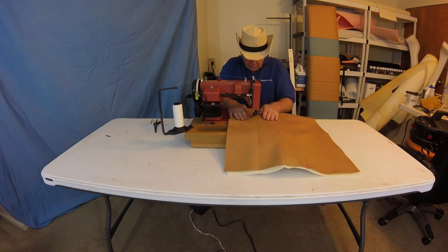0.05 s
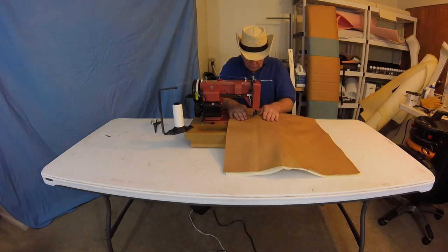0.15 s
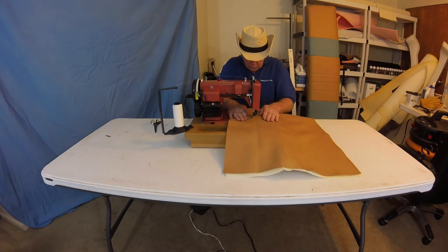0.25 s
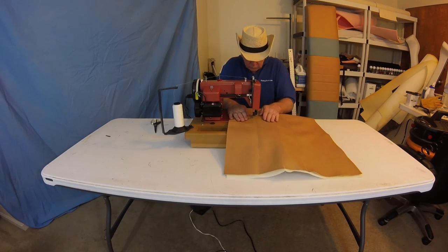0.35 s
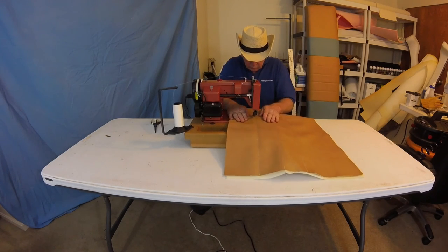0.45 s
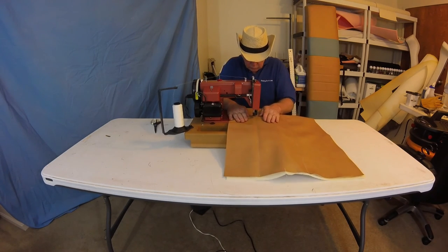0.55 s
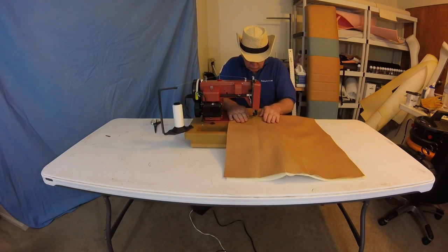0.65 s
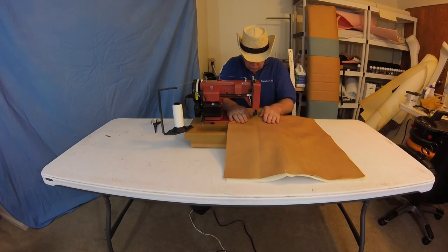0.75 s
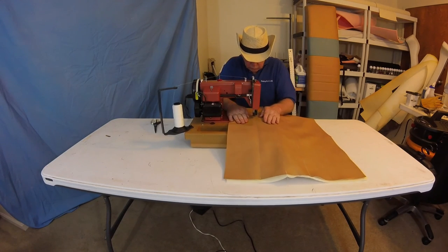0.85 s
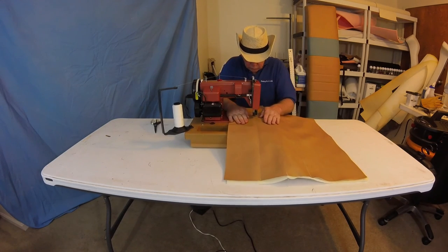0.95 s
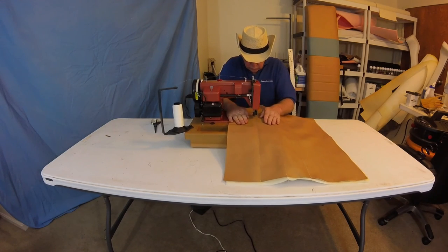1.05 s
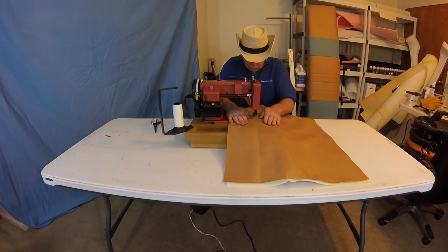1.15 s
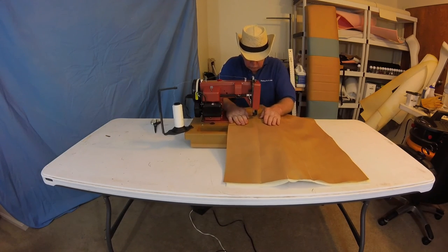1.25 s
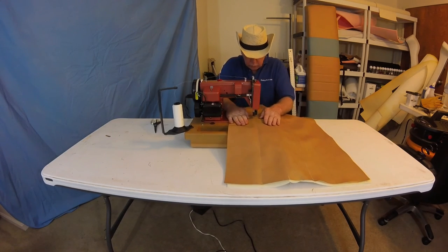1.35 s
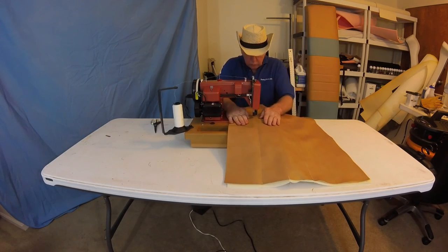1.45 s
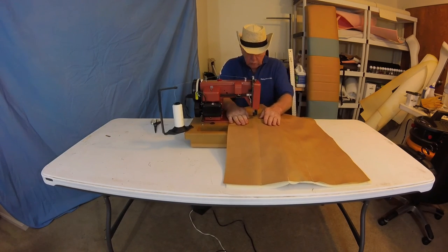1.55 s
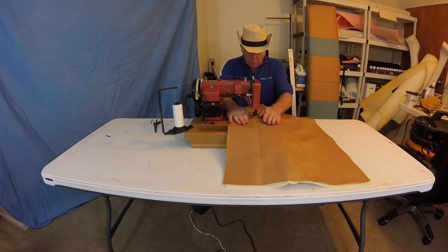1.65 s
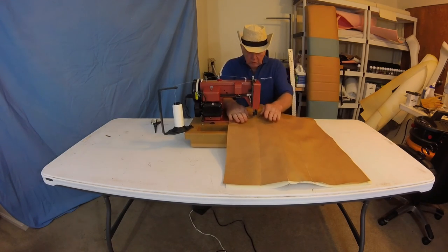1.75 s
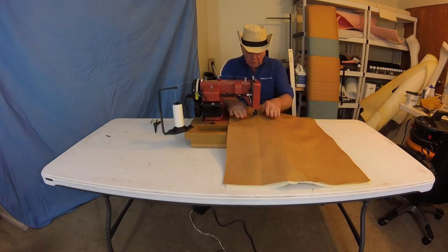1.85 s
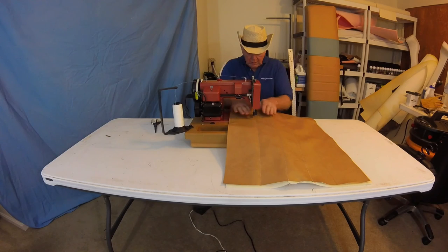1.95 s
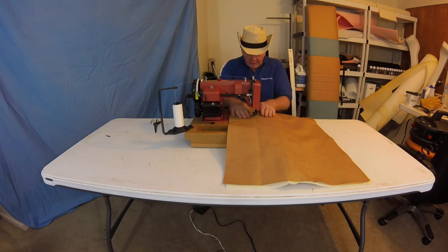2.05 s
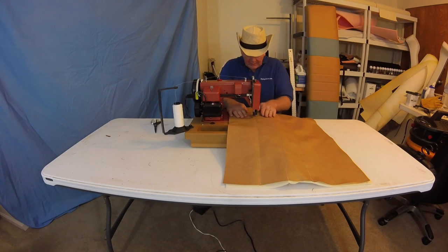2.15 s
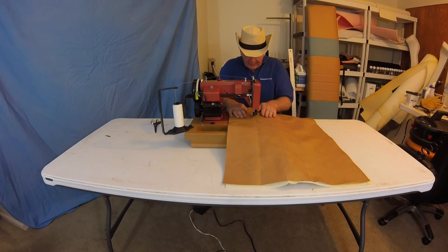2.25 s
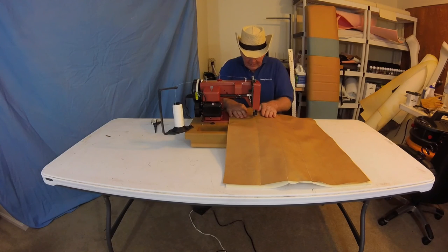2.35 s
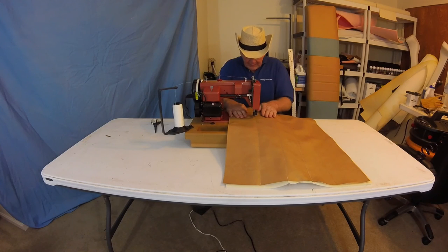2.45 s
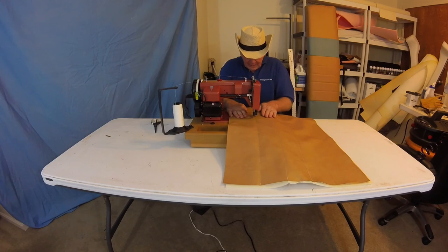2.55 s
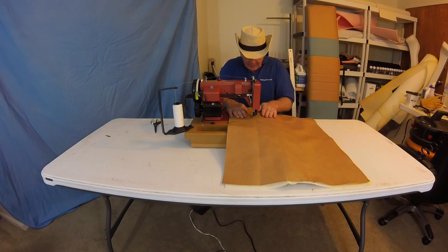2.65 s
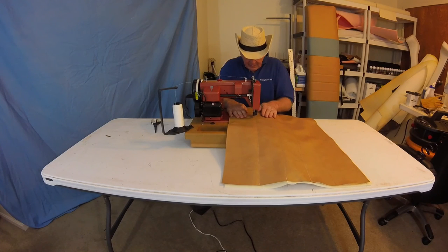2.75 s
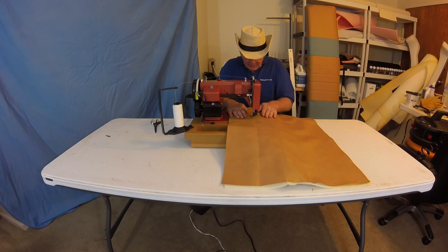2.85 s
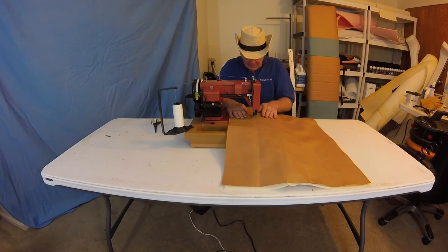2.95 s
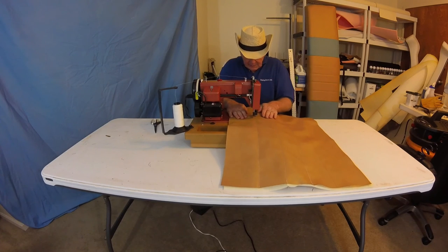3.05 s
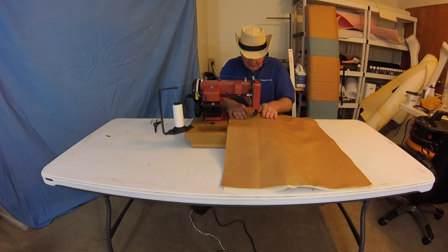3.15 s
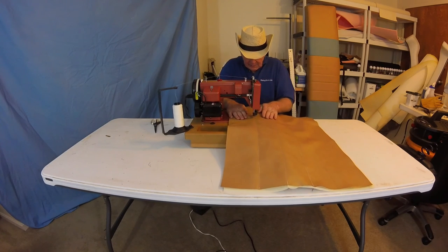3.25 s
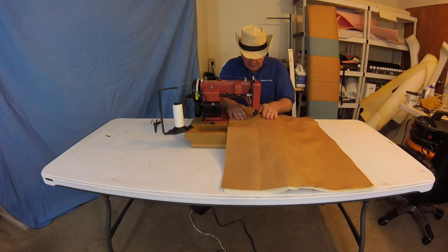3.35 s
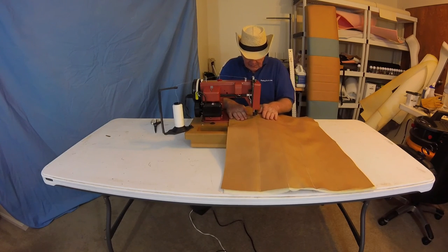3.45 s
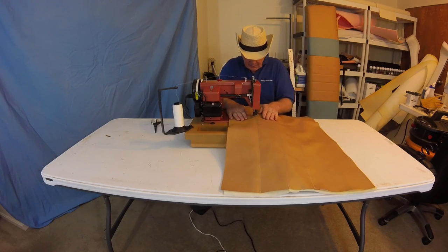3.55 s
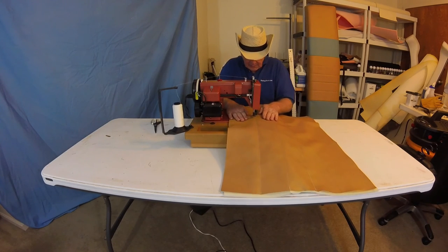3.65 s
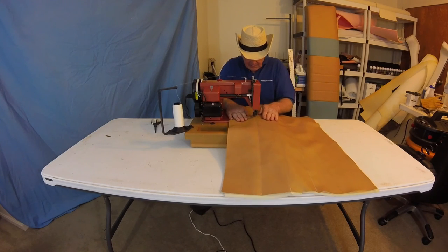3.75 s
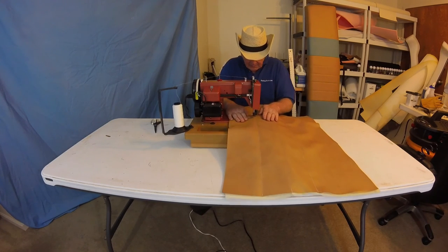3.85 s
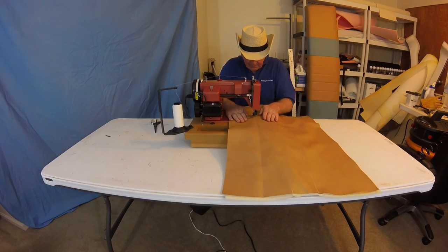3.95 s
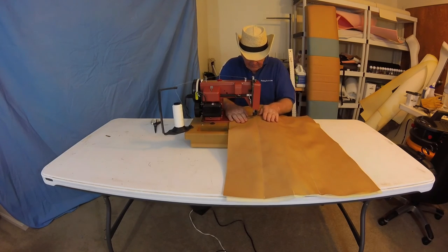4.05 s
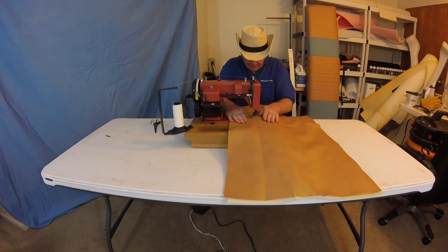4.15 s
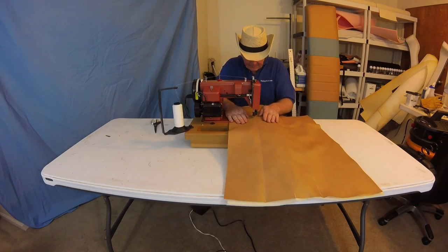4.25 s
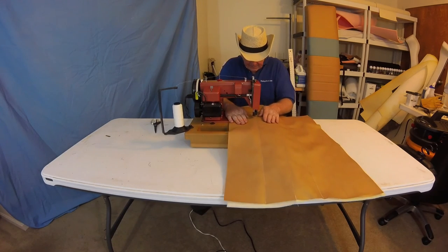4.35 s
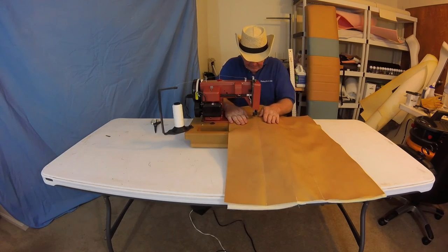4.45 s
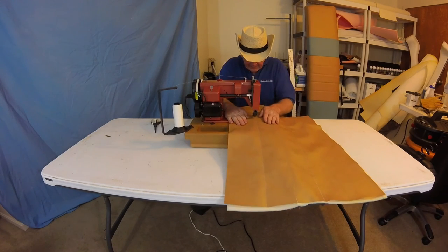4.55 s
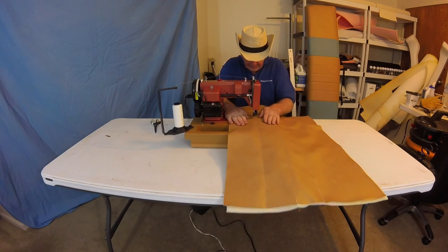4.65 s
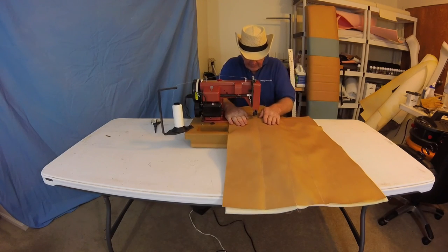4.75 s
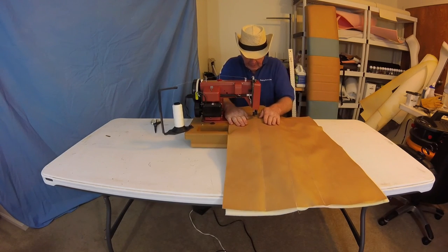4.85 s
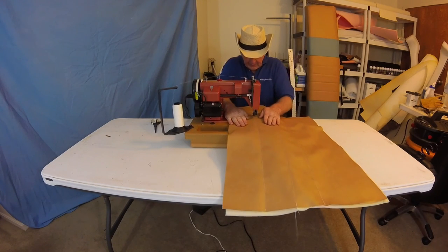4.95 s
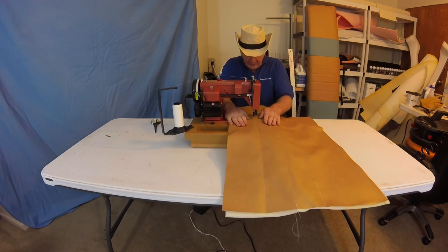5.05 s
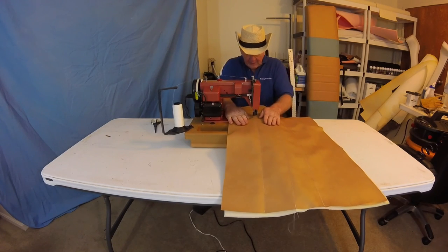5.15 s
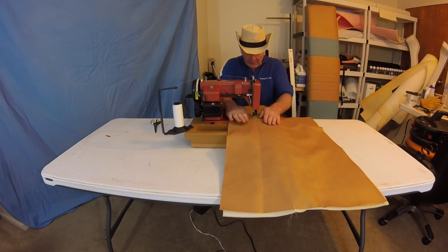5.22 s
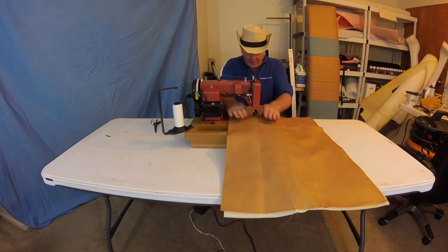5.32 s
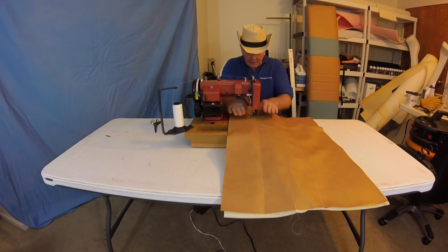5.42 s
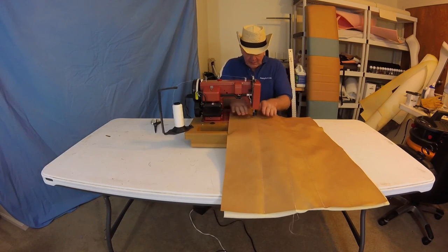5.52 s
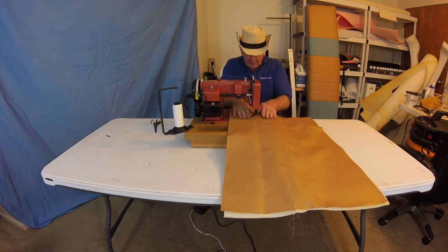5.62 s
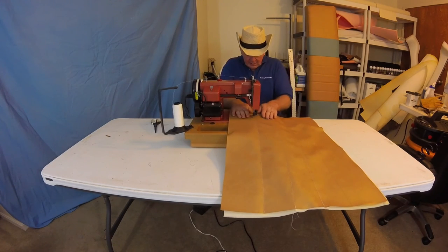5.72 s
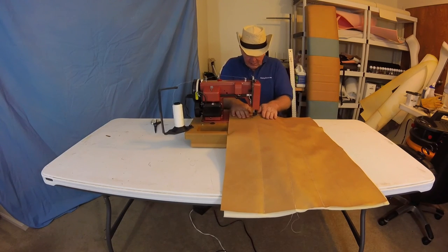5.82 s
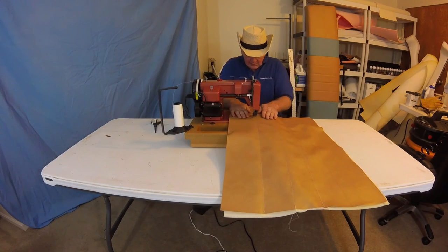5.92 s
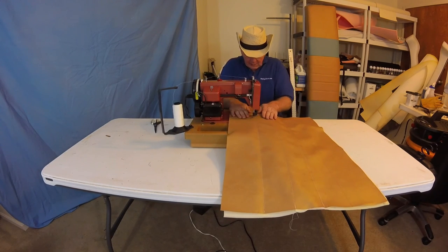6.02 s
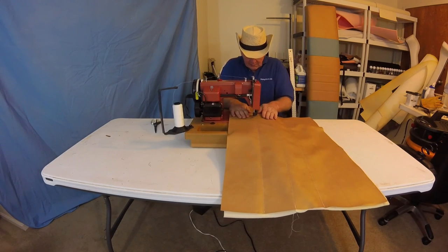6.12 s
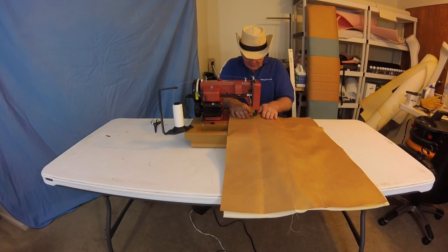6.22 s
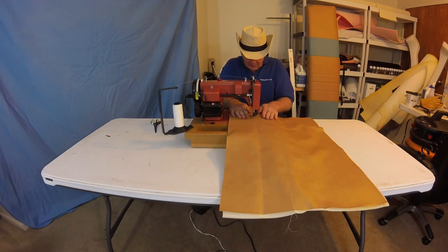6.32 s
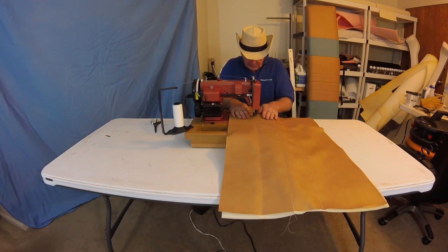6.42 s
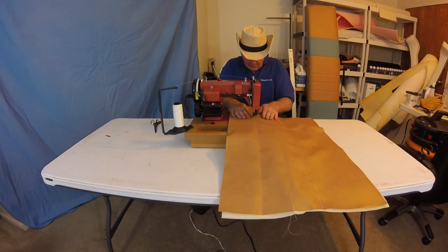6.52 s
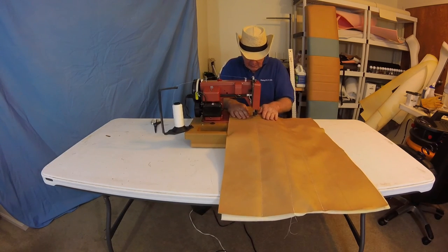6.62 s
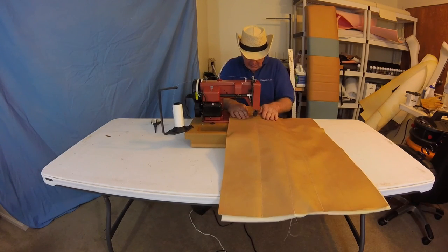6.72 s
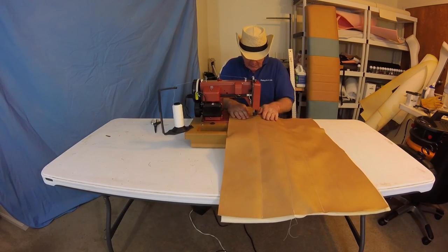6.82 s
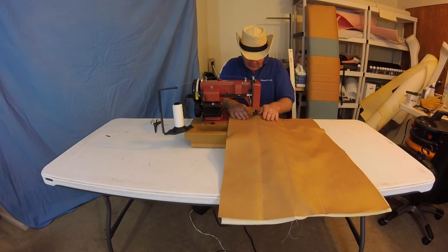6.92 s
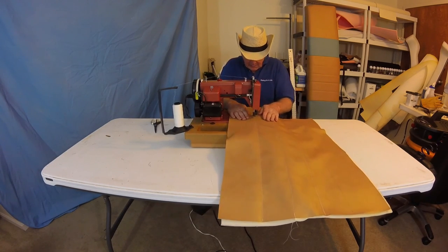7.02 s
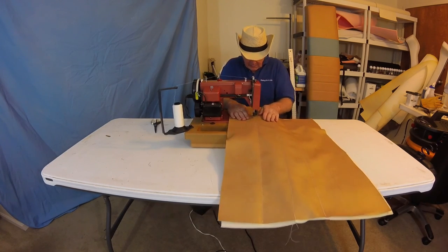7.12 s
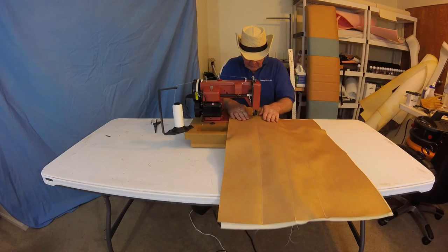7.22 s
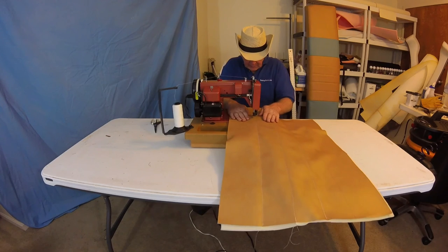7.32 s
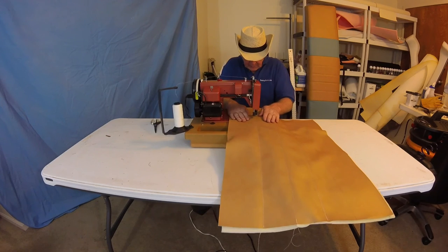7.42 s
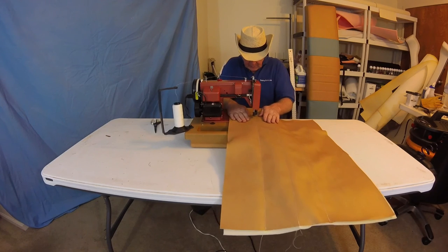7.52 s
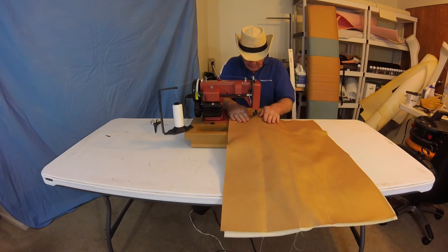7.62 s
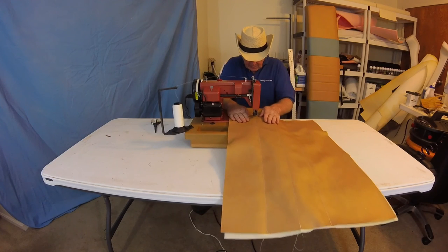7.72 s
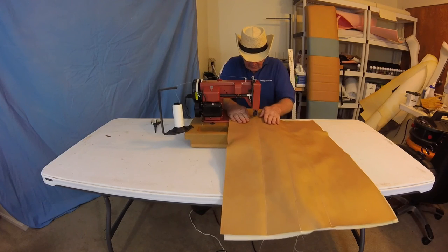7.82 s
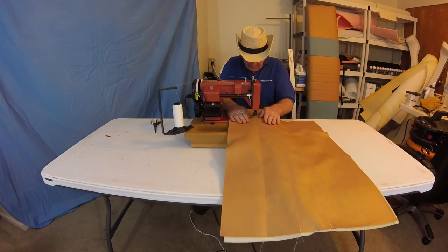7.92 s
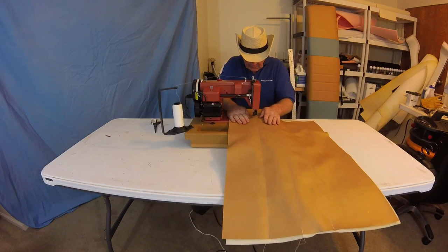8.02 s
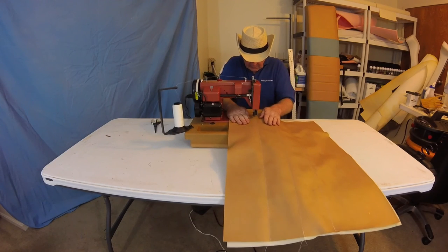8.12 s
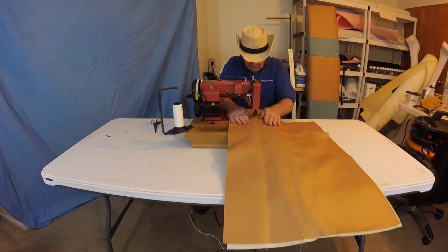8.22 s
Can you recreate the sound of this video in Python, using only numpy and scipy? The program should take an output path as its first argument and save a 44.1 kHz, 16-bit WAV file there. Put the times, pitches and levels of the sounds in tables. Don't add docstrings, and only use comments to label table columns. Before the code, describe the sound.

A heavy sewing machine on a hollow folding table, heard from a few metres away in a small cluttered workshop, nearly mono with a short tail. From 0 to about 1.1 s it runs at full speed: gritty motor whirr, rattling belts and gears, quick uneven stitch thumps. It slows with clacks and judder, stopping near 1.9 s. Hands scuff the vinyl and tap, the sharpest tap at 2.15 s, over low rumble and soft hiss. Around 2.7 s a mains buzz leads into a gentle restart, juddering near 2.9 s and reaching full speed by 3.8 s. It holds until 4.7 s, then coasts clacking to rest at 5.5 s. Scuffs and dull taps follow until about 6.1 s. At 6.4 s a harder jolt, buzz and brief thin squeak start the third run; belt teeth catch, pitch climbs, and steady sewing from 7.2 s continues to the end.

```python
import sys
import numpy as np
from scipy import signal
from scipy.io import wavfile
from scipy.ndimage import uniform_filter1d

SR = 44100
rng = np.random.default_rng(int(sys.argv[2]) if len(sys.argv) > 2 else 0)


def how_loud(loudness_db):
    steps = np.asarray(loudness_db, float) / 20
    return 10 ** steps


def file_out(sig):
    cols = np.atleast_2d(sig).T
    lim = np.clip(cols, -1, 1)
    pcm = np.round(lim * 32767).astype(np.int16)
    wavfile.write(sys.argv[1], SR, pcm)


N = 365129
T = np.arange(N) / SR

# time in seconds, speed in turns per second.
SHAFT = [
    [(0, 181), (.55, 182.2), (1.02, 179.5), (1.2, 144), (1.33, 127), (1.45, 97), (1.6, 80), (1.8, 40),
     (1.92, 5)],
    [(2.68, 5), (2.9, 103), (3.13, 137), (3.29, 146), (3.5, 175), (3.8, 182), (4.73, 181), (5.1, 97),
     (5.53, 5)],
    [(6.35, 5), (6.53, 90), (6.68, 122), (6.86, 142), (7.03, 149), (7.14, 165), (7.3, 170.5), (7.6, 172),
     (7.9, 174)],
]
FULL_TURNS_PER_S, REST_TURNS_PER_S = 180, 5


def evened(x):
    return x / np.sqrt(np.mean(x ** 2) + 1e-20)


def curve(rows, column=1):
    rows = np.vstack(rows)
    return np.interp(T, rows[:, 0], rows[:, column])


def colour(x, points, modes=()):
    hz = abs(np.fft.fftfreq(16384, 1 / SR))
    f, db = np.transpose(points)
    gain = how_loud(np.interp(np.log(hz + 1), np.log(f + 1), db, left=-70, right=-70))
    for centre_hz, width, lift_db in modes:
        gain = gain * (1 + (how_loud(lift_db) - 1) / (1 + (2 * (hz - centre_hz) / width) ** 2))
    log_gain = np.log(uniform_filter1d(gain, size=3))
    minimum_phase = -signal.hilbert(log_gain).imag
    taps = np.fft.ifft(np.exp(log_gain + 1j * minimum_phase)).real[:8192]
    return evened(signal.oaconvolve(x, taps)[:N])


def wander(hz):
    steps = rng.standard_normal(N // 64 + 1002)
    lowpass = signal.butter(2, hz * 128 / SR, output="sos")
    smooth = signal.sosfiltfilt(lowpass, steps)[500:-500]
    return np.interp(np.arange(N) / 64, np.arange(len(smooth)), evened(smooth))


def rattle(per_s, spread_db, share):
    share = np.clip(share, 0, 1)
    sizes = how_loud(spread_db * np.minimum(rng.exponential(1, N), 5)) * rng.choice([-1., 1.], N)
    impacts = evened(sizes * (rng.random(N) < per_s / SR))
    return np.sqrt(1 - share) * rng.standard_normal(N) + np.sqrt(share) * impacts


def fuzzy(hz, width):
    lowpass = signal.butter(2, width / 2, fs=SR, output="sos")
    slow = signal.sosfilt(lowpass, rng.standard_normal((2, N)).T @ [1, 1j])
    carrier = np.exp(2j * np.pi * np.cumsum(hz * np.ones(N)) / SR)
    return evened((carrier * slow).real)


def swells(rows, column):
    gain = np.zeros(N)
    for row in rows:
        u = T - row[0]
        span_s = np.maximum(np.where(u < 0, row[-2], row[-1]), .005)
        gain += how_loud(row[column] - 20 * abs(u) / span_s)
    return gain


def blows(rows, rise, fall, depth):
    db = np.zeros(N)
    for s, lift_db in rows:
        part = slice(max(round((s - .06) * SR), 0), round((s + .15) * SR))
        u = T[part] - s
        db[part] += depth * lift_db * np.exp(-.5 * (u / np.where(u < 0, rise, fall)) ** 2)
    return how_loud(db - uniform_filter1d(db, size=8000))


def labour():
    change = abs(np.gradient(uniform_filter1d(curve(SHAFT), size=4000))) * SR
    return np.clip(change / 60, 0, 1)


def powered():
    return uniform_filter1d(1. * (np.gradient(curve(SHAFT)) > 0), size=4000)


def rotor_beat():
    return 1 + 0.13 * np.cos(2 * np.pi * np.cumsum(curve(SHAFT)) / SR)


def tones(orders, levels_db, waver, jitter, band_hz):
    turns = np.cumsum(curve(SHAFT)) / SR
    out = np.zeros(N)
    for order, db in zip(orders, levels_db):
        swell = how_loud(db + waver * wander(21.0))
        out += swell * np.cos(2 * np.pi * order * turns + jitter * wander(19.3))
    sing_db = 2.4 * np.clip((curve(SHAFT) - 177) / 4, -1.5, 1)
    return out * np.sqrt(4 * band_hz / SR) * how_loud(-10 * labour() + sing_db)


def loudness(full_db, octave_db, jolt_share, pull_db):
    # time in seconds, extra jolt in dB.
    presses = [
        (2.7, 2.5),
        (6.37, 10),
    ]
    jolt_fall_s, wake_turns_per_s = 0.075, 35
    speed = curve(SHAFT)
    jolt_db = sum(db * np.exp(-np.maximum(T - s, 0) / jolt_fall_s) * (T > s) for s, db in presses)
    pulling = powered() * np.exp(-((speed - 145.6) / 24) ** 2)
    awake = np.clip((speed - REST_TURNS_PER_S) / wake_turns_per_s, 0, 1) ** 1.2
    speed_db = octave_db * np.log2(speed / FULL_TURNS_PER_S)
    return awake * how_loud(full_db + speed_db + jolt_share * jolt_db + pull_db * pulling)


def stitches(lag, mean_db, column):
    # time in seconds, extra clack in dB, extra thump in dB.
    snags = [(.005, 1.5, 1), (.406, 1, 1), (.69, 2, 3), (1.269, 6, -15), (1.395, 10, 7), (1.516, 2, 0),
             (1.628, 10, 2), (1.756, 12, 2), (2.776, -8, -1), (2.914, 0, 4), (3.257, 6, -8), (3.513, 1, 0),
             (4.197, 4.5, 0), (4.338, 3.5, -2), (4.544, 6, 7), (4.671, 6.5, 2), (4.767, 7, 4),
             (5.089, 6.5, -5), (5.191, 4, -2), (5.423, 7, 3), (6.424, 10, -2), (6.569, 5, 0),
             (6.685, 8.5, 7), (7.718, 6.5, 2), (7.95, 9, 2)]
    needle_down_s, turns_per_stitch = (.571, 4.014, 7.754), 20.7
    turns = np.cumsum(curve(SHAFT)) / SR
    run = np.searchsorted([table[0][0] for table in SHAFT[1:]], T)
    stitch = (turns - np.interp(needle_down_s, T, turns)[run]) / turns_per_stitch - lag
    at = T[1:][(np.diff(np.floor(stitch)) == 1) & (np.diff(run) == 0)]
    sizes = mean_db + 1.5 * rng.standard_normal(80)
    return [*zip(at, sizes), *((row[0], row[column]) for row in snags)]


def table_top():
    # frequency in Hz, level in dB.
    top_colour = [(38, -45), (65, -12.5), (86, -9.5), (129, -2.5), (172, -11), (242, -0.5), (314, -4.5),
                  (361, 3), (437, -3), (520, -2), (680, -29), (1140, -120)]
    drone = tones((.5, 1.39, 2), (-6.5, -9, -18), waver=0.73, jitter=0.89, band_hz=286)
    thumps = blows(stitches(lag=0, mean_db=2.5, column=2), rise=.018, fall=.018, depth=.8)
    gain = loudness(full_db=-35.5, octave_db=5.5, jolt_share=1.85, pull_db=1.8)
    return colour(rattle(400, 4.3, 0.17) + drone, top_colour) * gain * thumps


def cast_body(clacks):
    # frequency in Hz, level in dB.
    cast_colour = [(400, -12), (520, -6), (800, 0.5), (1200, -9), (1400, -14.5), (1650, -24.5), (2000, -85)]
    # frequency in Hz, width in Hz, lift in dB.
    cast_modes = [(651, 5, 9.5), (714, 100, 2), (809, 87, -4.5), (964, 8, 10.5), (1052, 26, 3),
                  (1176, 33, 6), (1360, 25, 5.5)]
    bright_turns_per_s, dull_hz = 80, 780
    speed = curve(SHAFT)
    pulley = how_loud(-19 + 1.46 * labour()) * fuzzy(speed * 10, 71)
    gear_tones = tones((3, 3.9, 4, 6), (-13, -21.5, -15, -19), waver=2.6, jitter=.7, band_hz=2500)
    body = colour(rotor_beat() * rattle(1500, 2.6, .5) + pulley + gear_tones, cast_colour, cast_modes)
    body *= loudness(full_db=-30.5, octave_db=7, jolt_share=2.04, pull_db=.6) * clacks
    dull = signal.sosfilt(signal.butter(2, dull_hz, fs=SR, output="sos"), body)
    return dull + (body - dull) * np.clip(speed / bright_turns_per_s, 0, 1)


def motor_whirr(clacks):
    # frequency in Hz, level in dB.
    motor_colour = [(1300, -8.5), (1700, -6), (2200, 1), (3000, -5.5), (4400, -8), (5000, -7.5),
                    (7000, -12), (8500, -8.5), (9000, -14.5), (12000, -17), (15000, -21)]
    # frequency in Hz, width in Hz, lift in dB.
    motor_modes = [(2014, 18, 7.2), (2160, 130, 0.95), (2243, 33, 7.4), (2550, 92, 4.3), (2868, 125, 5.6),
                   (3104, 160, 5.2), (3440, 154, 6.1), (4030, 83, 3.9), (6220, 160, 5.9), (7560, 150, 3.1),
                   (8030, 500, 3.2)]
    speed = curve(SHAFT)
    strain_db = 3 + (7 + 2 * powered()) * np.exp(-((speed - 136) / 24) ** 2) + 2 * wander(8)
    chatter = how_loud(-15) * fuzzy(speed * 22.6, 520)
    chatter += how_loud(-23 + strain_db) * fuzzy(speed * 24, 260)
    whine = tones((10, 11, 11.4, 12, 12.6, 13, 15.4, 23.2, 24),
                  (-19.5, -17.5, -20, -17.5, -14, -28, -22, -41, -10), waver=1.6, jitter=.38, band_hz=11000)
    whirr = colour(rotor_beat() * rattle(3000, 2.5, .25) + chatter + whine, motor_colour, motor_modes)
    whirr *= how_loud(0.75 * wander(18.0))
    return whirr * loudness(full_db=-40, octave_db=11, jolt_share=2.16, pull_db=2.5) * clacks ** 0.26


def machine():
    clacks = blows(stitches(lag=0.705, mean_db=3, column=1), rise=0.01, fall=0.011, depth=0.7)
    return table_top() + cast_body(clacks) + motor_whirr(clacks)


def shake():
    # frequency in Hz, level in dB.
    floor_colour = [(9, -37), (18, 6.5), (33, 7.5), (50, -3), (68, -10), (95, -37)]
    level_db = -54.5 + 7 * curve(SHAFT) / FULL_TURNS_PER_S + 3.5 * wander(6.)
    return colour(rng.standard_normal(N), floor_colour) * how_loud(level_db)


def workshop():
    # frequency in Hz, level in dB.
    air_colour = [(35, -49), (60, -2), (228, -13.5), (388, -18.5), (1020, -24.5), (1620, -30),
                  (5120, -38.5), (9100, -45.5), (10700, -49), (13500, -49), (14800, -66)]
    hum = how_loud(-66.5) * fuzzy(242, 15)
    return hum + how_loud(-51.5) * colour(rng.standard_normal(N), air_colour)


def belt():
    # time in seconds, level in dB, rise in seconds, fall in seconds.
    judders = [
        (1.226, -38, .1, 0.089),
        (1.54, -36, 0.28, 0.19),
        (2.928, -25, 0.068, 0.074),
        (3.128, -33, .05, 0.22),
        (5.04, -32, 0.013, 0.24),
        (5.298, -37, 0.033, 0.15),
        (6.486, -46, 0.06, .2),
        (6.604, -28.5, 0.27, 0.19),
    ]
    # time in seconds, rise in dB.
    catches = [(1.62, -8), (1.745, 1), (2.776, 1), (2.93, -3), (6.385, 6), (6.432, 14), (6.48, 16.5),
               (6.562, 11), (6.583, -2), (6.612, 10), (6.68, -2)]
    turning = np.clip(curve(SHAFT) / 8 - 1.6, 0, 1)
    ring = how_loud(-6.5) * fuzzy(1085, 82) * swells(judders, column=1) * turning
    ring *= blows(catches, rise=0.0033, fall=0.016, depth=1.0)
    squeak_s, squeak_db, squeak_hz, length_s = 6.424, -52.5, 3480, .07
    u = np.maximum(T - squeak_s, 0) / length_s
    squeak = how_loud(squeak_db) * fuzzy(squeak_hz, 340) * np.minimum(u * 10, 1) * np.exp(-u ** 2)
    return ring + squeak


def hands():
    # time in seconds, dull scuff in dB, bright slide in dB, rise in seconds, fall in seconds.
    moves = [
        (1.8, -48, -70, 0.055, .13),
        (2.152, -44, -70, 0.02, 0.072),
        (2.23, -60, -73, .08, 0.11),
        (2.4, -58, -80, 0.083, .5),
        (2.77, -51, -77, 0.3, .05),
        (5.416, -42, -69, 0.13, 0.055),
        (5.742, -45, -73, 0.055, 0.15),
        (5.918, -49, -75, 0.16, .1),
        (6.05, -58, -81, 0.088, 0.46),
        (6.4, -49, -71, .045, 0.037),
    ]
    # time in seconds, peak in dB, frequency in Hz.
    taps = [(1.961, -61, 323), (2.088, -48, 330), (2.149, -32.5, 928), (2.423, -47, 570), (2.667, -47, 350),
            (5.595, -45.5, 328), (5.676, -42, 467), (5.716, -55, 371), (5.753, -39, 470), (5.961, -49, 315),
            (6.071, -49, 390)]
    # frequency in Hz, level in dB.
    scuff_colour = [(88, -46), (150, 0), (225, 9.5), (299, -0.5), (475, 5), (586, -3), (930, 3),
                    (1720, -19), (14800, -54)]
    # frequency in Hz, level in dB.
    slide_colour = [(1500, -19), (3000, 1), (7000, -11), (13000, -12), (15500, -27)]
    out = how_loud(-4.0) * colour(rattle(550, 1.9, 0.24), scuff_colour) * swells(moves, column=1)
    out += how_loud(6.5) * colour(rattle(2000, 2., .2), slide_colour) * swells(moves, column=2)
    t = np.arange(3000) / SR
    envelope = how_loud(-60 * t / .06) * np.minimum(t / .002, 1)
    for (s, db, hz), spread in zip(taps, rng.uniform(0.55, 1.5, (len(taps), 4))):
        ring = sum(np.sin(2 * np.pi * hz * f * t) for f in (1, *spread)) / 2.8
        out[round(s * SR):][:len(t)] += how_loud(db) * envelope * ring
    return out


def stall():
    # time in seconds, level in dB, rise in seconds, fall in seconds.
    buzzes = [
        (2.5, -62, .25, 0.35),
        (2.8, -49, 0.24, 0.17),
        (6.4, -52, 0.054, .15),
    ]
    buzz = np.zeros(N)
    for k, db in enumerate((-1.5, 3.5, -3)):
        buzz += how_loud(db) * np.sin(2 * np.pi * (k + 1) * 120 * T)
    return buzz * swells(buzzes, column=1)


def scene():
    near = machine() + belt() + hands() + stall()
    t = np.arange(12000) / SR
    tail = rng.standard_normal(len(t)) * how_loud(-60 * t / 0.25) * (t > .006)
    mono = near + how_loud(-10.5) * signal.oaconvolve(near, tail / np.linalg.norm(tail))[:N]
    mono += shake() + workshop()
    return np.array([mono, mono])


def low_pass(x):
    return signal.sosfilt(signal.butter(12, 14920, fs=SR, output="sos"), x)


def record(dry):
    # frequency in Hz, factor on the neighbouring level.
    dropouts = [(3000, 0.21), (8600, 0.55), (9600, .8), (12000, 0.67), (13800, 1.2), (15000, 1)]
    # frequency in Hz, level in dB against their sum.
    channel_smear = [(60, -33), (150, -29), (370, -31), (930, -31), (2310, -27), (5750, -24), (14300, -23)]
    hz, t, z = signal.stft(dry[0], SR, nperseg=2048)
    luck = rng.random((len(hz) // 16 + 1, len(t), 2)).repeat(16, 0)[:len(hz)]
    around = np.sqrt(uniform_filter1d(abs(z) ** 2, size=48, axis=0))
    factor = np.interp(hz, *np.transpose(dropouts), left=0)[:, None]
    kept = abs(z) > around * factor * 2 * luck[..., 0]
    top_lost = np.interp(t, T, wander(6.)) < -.1
    kept &= ~((hz > 14200)[:, None] & top_lost)
    smear = how_loud(np.interp(hz, *np.transpose(channel_smear)) + 6 + hz / 6000)[:, None]
    smear = smear * (luck[..., 1] < .35) * np.exp(2j * np.pi * rng.random(z.shape))
    sides = z * kept * np.array([1 + smear, 1 - smear])
    both = signal.istft(sides, SR, nperseg=2048)[1][:, :N]
    return low_pass(both)


dry = scene()
out = record(dry)
file_out(out)
```